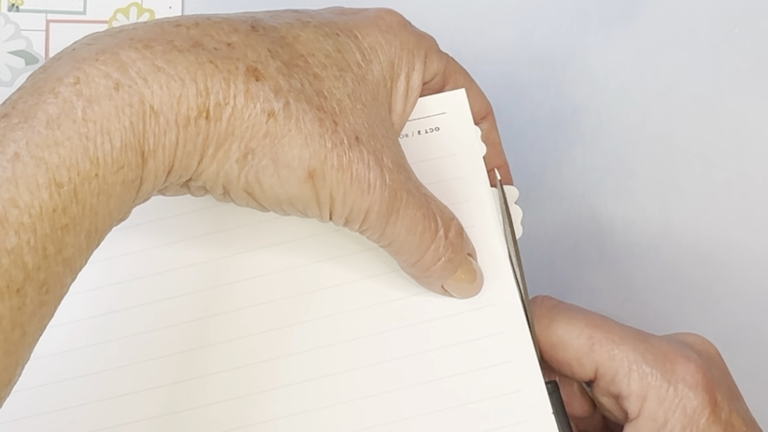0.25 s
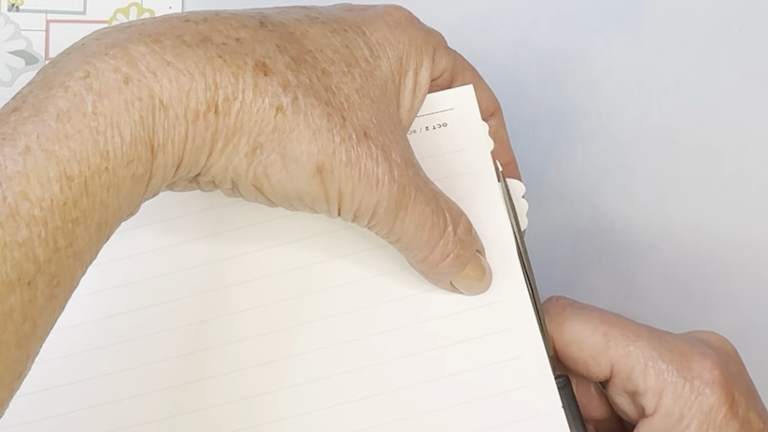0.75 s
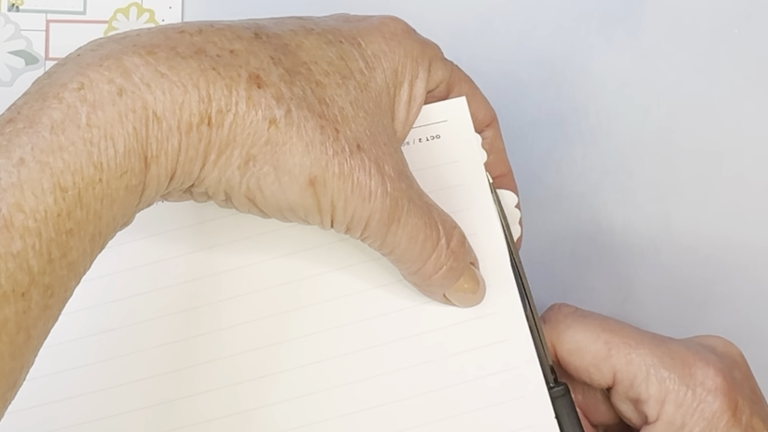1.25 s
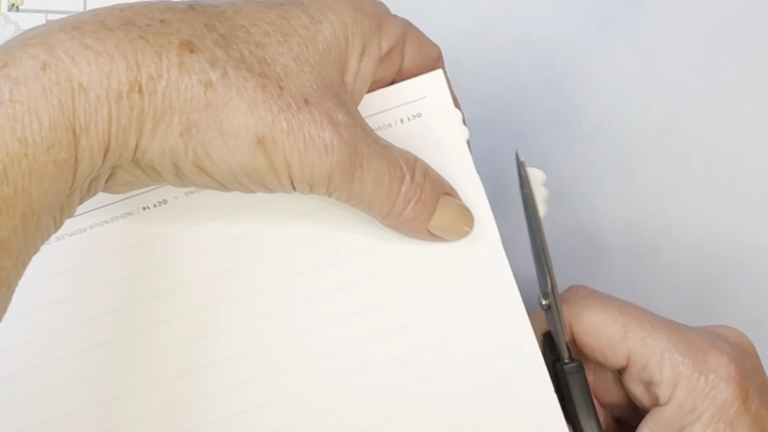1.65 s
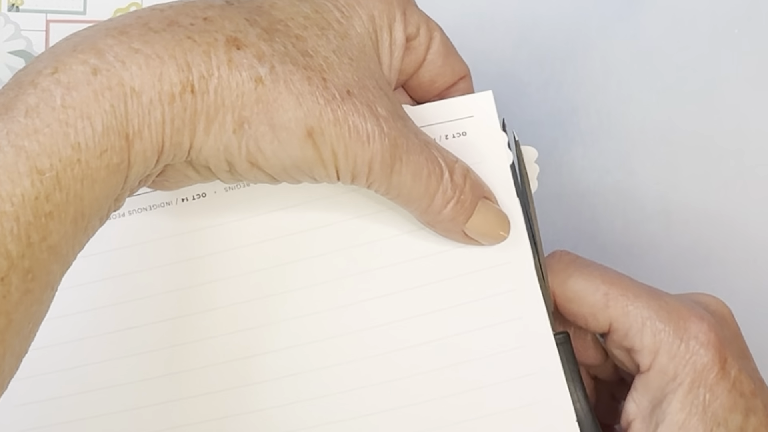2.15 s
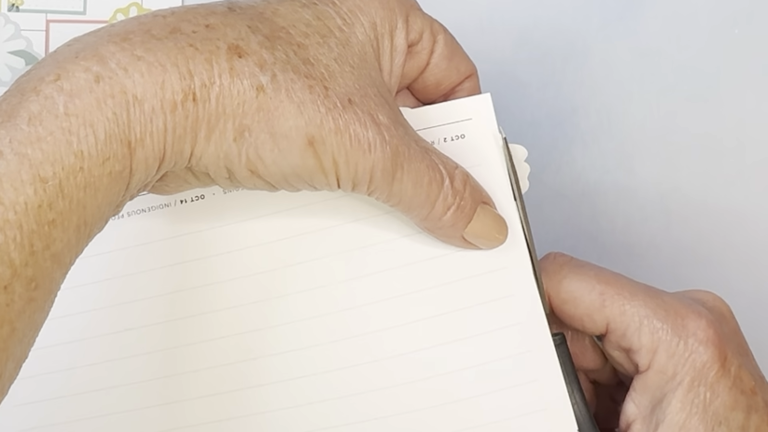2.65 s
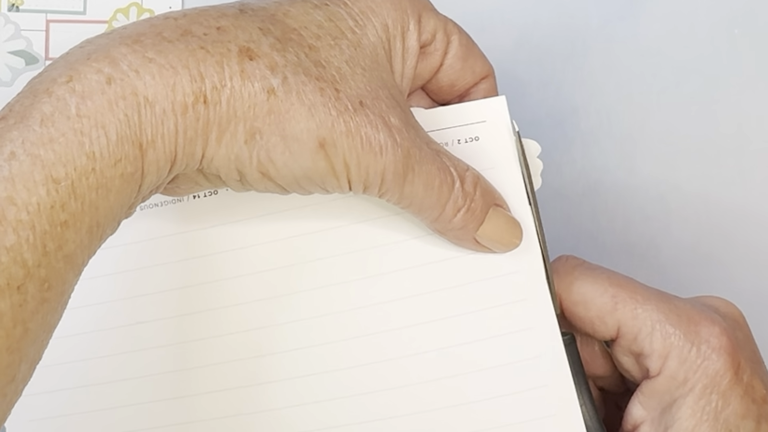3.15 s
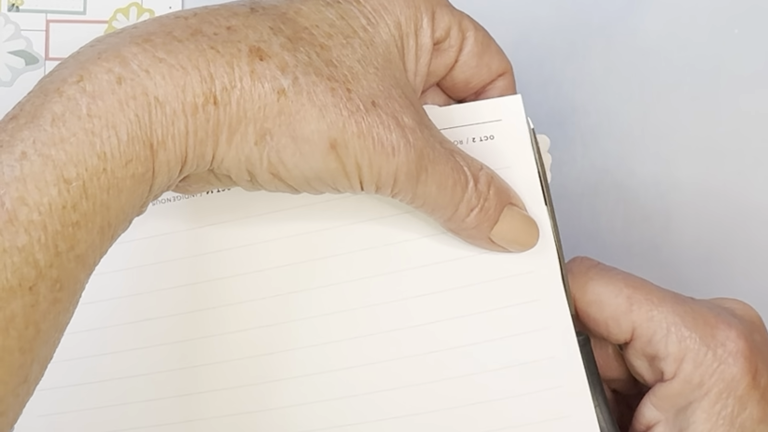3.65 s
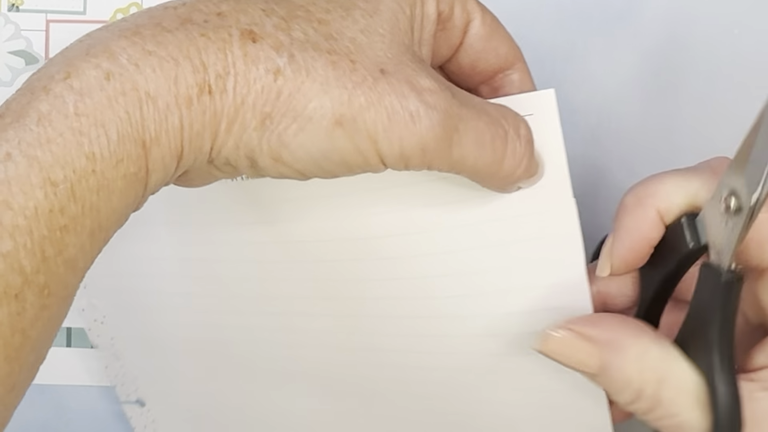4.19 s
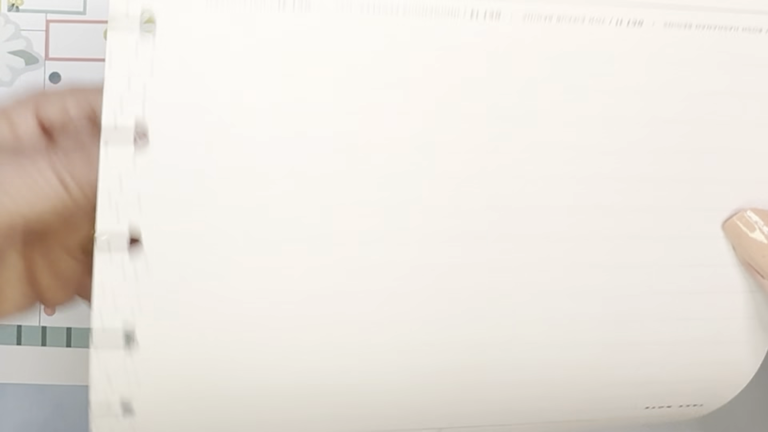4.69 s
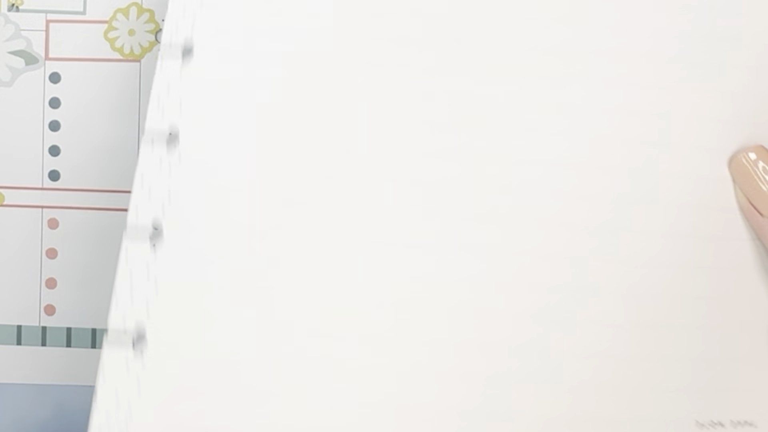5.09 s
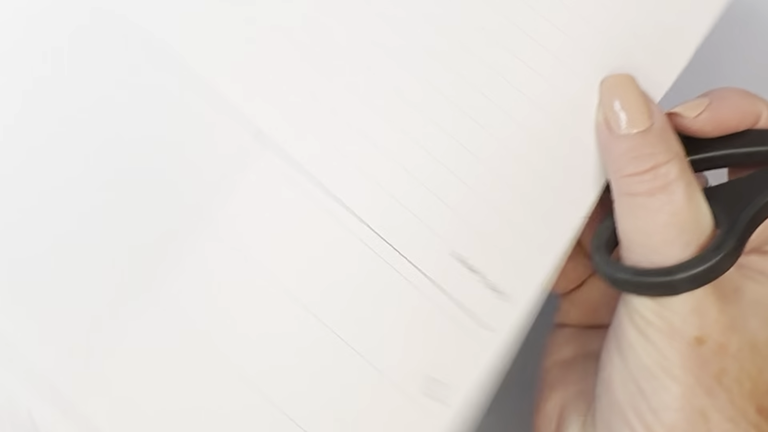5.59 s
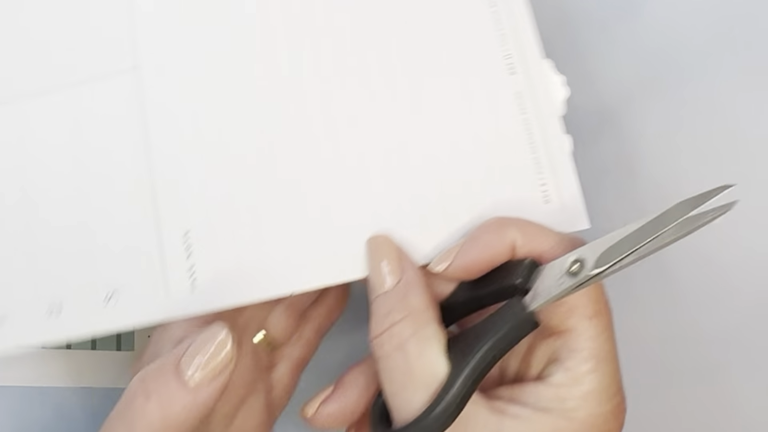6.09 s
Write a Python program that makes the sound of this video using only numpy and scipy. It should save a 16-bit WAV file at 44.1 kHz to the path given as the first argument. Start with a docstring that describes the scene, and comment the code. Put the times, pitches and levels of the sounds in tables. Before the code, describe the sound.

Close, dry paper handling: sticky rubs and small crackles, a sparse pause, then a sharp snap and crowded flaps, rustles and desk bumps.

```python
"""Hands rub, peel, bend and turn a sheet of paper over a desk, close to a two-port microphone.
Separate strokes and snaps come first, a sparser stretch after 2 s; the page lifts from 3.5 to 4.22 s,
then snaps and thuds crowd together, with two thin squeaks near 5.35 s. Stick-slip noise and cracks excite
resonances of the hollow under the page, the stiff sheet, its sliding edge and the desk; filtered air
noise and two wavering hum tones lie behind throughout, and the recorder widens the treble by phase."""
import sys
import numpy as np
from scipy import signal
from scipy.fft import rfft, irfft
from scipy.io import wavfile
from scipy.ndimage import uniform_filter1d

SR = 44100
rng = np.random.default_rng(int(sys.argv[2]) if len(sys.argv) > 2 else 0)


def pcm_store(signal):
    """Save signal as 16-bit PCM."""
    levels = np.round(np.clip(np.atleast_2d(signal), -1, 1) * 32767)
    wavfile.write(sys.argv[1], SR, levels.astype(np.int16).T)


N = 279153
T = np.arange(N) / SR  # s
HZ = np.fft.rfftfreq(N, 1 / SR)

# lower and upper resonances of the stiff sheet: (f/Hz, width/Hz, level/dB)
SHEET_LOW = [(1533, 520, 5), (2154, 650, 1.3)]
SHEET_HIGH = [(2760, 1120, 2.2), (4040, 1180, 2.6)]


def gain_of(db):
    """Decibel law: 20 dB is a factor of ten in amplitude."""
    return 10 ** (np.asarray(db) / 20)


def evened(x):
    """Normalization to unit root mean square."""
    return x / np.sqrt(np.mean(x ** 2) + 1e-20)


def read(points, hz):
    """Interpolation of a spectrum curve along logarithmic frequency."""
    f, value = np.transpose(points)
    return np.interp(np.log(hz + 1), np.log(f + 1), value)


def add(mix, s, sound):
    """Superposition: adds a sound to the mix, in place, from time s."""
    part = mix[round(s * SR):][:len(sound)]
    part += sound[:len(part)]


def ports(a, b):
    """Partial coherence: two ports hear a partly shared sound, the right one nearer to the hands."""
    # likeness of the two ports: (f/Hz, likeness 0-1)
    likeness = [(25, 0.72), (300, 0.42), (800, 1), (1300, 1), (2300, 0.94), (3500, 0.028), (6500, 0.049),
                (8500, 0.92)]
    # phase by which the left port lags: (f/Hz, lag/rad)
    phase_lag = [(60, 0.81), (800, 1.03), (1500, 1.34), (2500, 1.83), (4000, -0.16), (7000, -0.7),
                 (8000, 0.15)]
    # level of the left port over the right: (f/Hz, level/dB)
    level_tilt = [(60, -6.5), (200, -9), (700, -9.5), (2000, -6.5), (2800, -10), (3500, -9), (4100, -12),
                  (5100, -10), (6250, -13.5), (7600, -8.5), (8600, -0.5)]
    same = np.clip(read(likeness, HZ), 0, 1)
    right = rfft(a)
    left = same * right + np.sqrt(1 - same ** 2) * rfft(b)
    left = left * np.exp(-1j * read(phase_lag, HZ))
    tilt = gain_of(read(level_tilt, HZ) / 2)
    return np.array([left * tilt, right / tilt])


def body(modes, drive, cracks=0):
    """Modal resonance: driven noise and single cracks ring steep modes; unit drive gives unit level."""
    ring = 0
    for k, (hz, width, db) in enumerate(modes):
        sign = (-1) ** k  # neighbouring modes alternate in sign
        ring = ring + sign * gain_of(db) / (1 + 2j * (HZ - hz) / width) ** 2
    noise = rng.standard_normal((2, N))
    unit = np.sqrt(np.mean(irfft((ports(*noise) * ring).mean(0), N) ** 2))
    return irfft(ports(*(noise * drive + cracks)) * ring, N) / unit


def paper():
    """Common excitation: one grip drives hollow, sheet and edge; the desk thuds under the wrists."""
    # as the sheet bends: (t/s, sheet's low modes over its high modes/dB, shift to the left/dB,
    # bass of the hollow/dB, lift of the hollow's last mode but one/dB, lift of the sheet's top mode/dB,
    # fizz/dB)
    bending = [(0.0, 0, 6, 15, -8, 1.5, 0), (0.25, 3.5, -2, 2, 4.5, 3, 1), (0.7, -6, 1, 8.5, 2, -2.5, -5),
               (1.3, 3, -1, -0.5, 1, 4, 1), (1.42, -1.5, 2, 5, 0.5, -2, -9),
               (1.75, 1, 0.5, -23, 10, 6, -12), (2.05, -10.5, 2.5, -23, -1, -15, 2.5),
               (2.77, 5.5, 0.5, -2, 4, 1.5, -7), (3.66, -5.5, 1, 4, -2, 0, -1),
               (3.83, 3, 1, -23, 7.5, -2.5, -14), (4.0, -14.5, 1, 12, 8, -6, -1),
               (4.11, 3.5, 1, 13.5, 9, -0.5, -12.5), (4.59, -3.5, 2, -38, -8.5, 1, 13.5),
               (4.7, 0, 1, 9, 0, -5.5, -4.5), (5.13, -1.5, -1, 16.5, 1.5, -0.5, -3.5),
               (5.22, 4, -1.5, 10, -3.5, 2, 6), (5.58, -8, 0, -10, -9, -9, -8),
               (5.68, -7.5, 3, 7.5, 4.5, -5.5, 5), (6.17, -7, 5.5, -4, 0.5, -7.5, -4.5)]
    s, *columns = np.transpose(bending)
    low_db, left_db, deep_db, bright_db, top_db, fizz_db = (np.interp(T, s, c) for c in columns)
    rub_db, stiff_db, slide_db, sticky = hands()
    uneven_db = 4.5  # unevenness of the slips in a fully sticky stroke
    grip_db = uneven_db * sticky * slips(per_s=95, t60=0.073, spread_db=3.0)
    crackle_db = 0.48 * slips(per_s=170, t60=0.0012, spread_db=11)
    tick = sticky * ticks()

    hollow_drive = excitation(rub_db, grip_db + crackle_db, tick, crack_db=24,
                              column=0, longer=0.58, early_ms=2.555)
    cavity = hollow(hollow_drive, deep_db, bright_db)
    sheet_drive = excitation(stiff_db, 0.74 * grip_db + crackle_db, tick, crack_db=15,
                             column=2, longer=0.49, early_ms=0.64)
    plate = sheet(sheet_drive, low_db)
    edge_drive = excitation(slide_db, 0.04 * grip_db + 2.92 * crackle_db, tick, crack_db=15,
                            column=3, longer=0.79, early_ms=0.22)
    near = shifting(cavity + plate + edge(edge_drive), held_db=2.0, turned_db=3.0, top_db=top_db)
    balance = gain_of(np.array([left_db, -left_db]) / 2)
    return (near + desk(rub_db)) * balance + fizz(edge_drive, fizz_db)


def excitation(level_db, texture_db, tick, crack_db, column, longer, early_ms):
    """Broadband excitation: a noise envelope for strokes and rustle, and impulses for cracks and ticks."""
    rustle, cracks = snap_drive(column, longer, early_ms, crack_db)
    envelope = gain_of(level_db + texture_db) + rustle
    impulses = cracks + tick * gain_of(level_db + crack_db)
    return np.array([envelope, impulses])


def hollow(drive, deep_db, bright_db):
    """Cavity resonance: the hollow's bass and one upper mode rise and fall in level over time."""
    # resonances of the hollow: (f/Hz, width/Hz, level/dB)
    modes = [(463.5, 148, 3), (577.4, 88, -1), (801.4, 224, 8.5), (992, 171, 2.5), (1134, 127, 5.5),
             (1785, 570, -12)]
    sound = body(modes, *drive)
    bass_band = HZ / (HZ - 120j) / (1 + 1j * HZ / 420) ** 2
    deep = irfft(rfft(sound) * bass_band, N)
    hz, width, _ = modes[-2]
    detuning = HZ / hz - hz / (HZ + 1)
    bright = irfft(rfft(sound) / (1 + 1j * detuning * hz / (2 * width)), N)
    return sound + gain_of(deep_db) * deep + (gain_of(bright_db) - 1) * bright


def sheet(drive, low_db):
    """Plate modes: bending moves the power of the stiff sheet between its low and high modes."""
    low_share = 1 / (1 + gain_of(-2 * low_db))  # of the power
    low = body(SHEET_LOW, *drive * np.sqrt(low_share))
    return low + body(SHEET_HIGH, *drive * np.sqrt(1 - low_share))


def edge(drive):
    """Friction-driven resonance of the sliding edge."""
    # resonances of the edge: (f/Hz, width/Hz, level/dB)
    modes = [(3700, 2700, -3), (5540, 1210, 5.5), (6260, 720, 6), (7880, 3060, 1.5)]
    return body(modes, *drive)


def fizz(drive, fizz_db):
    """Nonlinear friction: the faster the slide, the brighter, by a power law of the edge's drive."""
    # resonances of the fizz: (f/Hz, width/Hz, level/dB)
    modes = [(9540, 3900, -0.68), (14570, 2200, -1.3)]
    expanded = np.sign(drive) * abs(drive) ** 1.236
    return body(modes, *gain_of(7.5 + fizz_db) * expanded)


def hands():
    """Power addition: levels (dB) of rubbing, sheet and edge, and stickiness weighted by stroke power."""
    # strokes over the page: (start t/s, length/s, rubbing level/dB, swell to the end/dB,
    # stiff sheet over the rubbing/dB, sliding edge over the rubbing/dB, stickiness 0-1)
    strokes = [(0.068, 0.14, -62.5, 8, -2, -11.5, 1), (0.256, 0.14, -57.5, -1.5, -1.5, -10.5, 1),
               (0.473, 0.36, -56.5, 3, -2, -10.5, 1), (0.944, 0.018, -60, 0, -7, -17, 0.5),
               (1.024, 0.042, -58.5, -0.5, -8, -14.5, 0), (1.137, 0.053, -57.5, 4, -3.5, -8.5, 0.1),
               (1.228, 0.081, -61.5, 0.5, -4, -10, 0.56), (1.319, 0.12, -50, 7.5, -2, -12.5, 1),
               (1.463, 0.059, -52.5, -4, 2, -5.5, 0.5), (1.535, 0.084, -50, -1.5, -4, -12, 0.86),
               (1.617, 0.19, -57, 8, 2.5, -3.5, 0.27), (1.804, 0.14, -60.5, -6.5, 3.5, -12, 0.04),
               (1.983, .18, -51, 3, -1.5, -20, 0), (2.333, 0.017, -50.5, -6.5, -3.5, -15, 0.75),
               (2.403, 0.043, -75.5, 16, -3.5, -25, 0.4), (2.656, 0.11, -50.5, 2.5, -7.5, -28, 0.35),
               (2.953, 0.066, -46.5, -2, -3.5, -11, 1), (3.318, 0.12, -51.5, -1, -2, -11, 1),
               (3.525, 0.16, -67, 18, -1, -8, 0.96), (3.682, 0.041, -35.5, -9.5, -1, -12.5, 0.8),
               (3.734, 0.1, -41.5, -7, -2.5, -13.5, 0.56), (3.868, 0.044, -54, -5.5, 0.5, -7.5, 0.6),
               (3.931, 0.019, -47.5, 3, -2.5, -10.5, 0.74), (3.969, 0.081, -51.5, -4, 3.5, -4.5, 0.5),
               (4.081, 0.036, -53.5, 11.5, -3.5, -4.5, 0.43), (4.127, 0.13, -44.5, -8, -2, -3.5, 0.5),
               (4.285, 0.22, -55.5, 2, 4, 7, 0.79), (4.527, 0.018, -42, -4.5, -2.5, -4, 0.74),
               (4.561, 0.1, -64.5, 7, 9.5, 8, 0.8), (4.694, 0.011, -41, -11.5, 2, 1, 1),
               (4.76, 0.13, -35, -16, -1, -13, 1), (4.902, 0.094, -47, -10, -4.5, -11.5, 1),
               (5.097, 0.042, -48, -6, 3.5, 2, 0.54), (5.162, .12, -50.5, 8, -15, -15.5, 0.95),
               (5.298, 0.066, -57, 3, -1, 3.5, 0.1), (5.38, 0.074, -56, 6.5, -5.5, -12.5, 0.47),
               (5.47, 0.06, -46, 9, -3.5, -7.5, 0.27), (5.556, 0.049, -37, -3, -8, -9.5, 0.14),
               (5.627, 0.18, -50, -1, 4, 2, 0.53), (5.801, 0.17, -61, -1.5, 9, 14, 0.3),
               (5.973, 0.056, -48, 1, 0, -2, 0.7), (6.055, 0.096, -53.5, -1.5, 7, 8, 0),
               (6.157, 0.089, -47, 4, 1, -1.5, 0.7), (6.27, 0.076, -53.5, -0.5, 6.5, 5, 1)]
    rise_db_per_s, fall_db_per_s = 905, 471  # how fast a stroke sets in and lets go
    rest_db = np.array([-76.5, -77, -82.5])  # hands at rest: rubbing, sheet, edge
    power, stuck = gain_of(2 * rest_db)[:, None] * np.ones(N), np.zeros(N)
    for start, length, db, swell_db, sheet_db, edge_db, sticky in strokes:
        stroke = held(start, length, db, swell_db, rise_db_per_s, fall_db_per_s)
        power = power + gain_of(2 * np.array([0, sheet_db, edge_db]))[:, None] * stroke
        stuck = stuck + np.clip(sticky, 0, 1) * stroke
    return *10 * np.log10(power), stuck / power[0]


def held(start, length, db, swell_db, rise_db_per_s, fall_db_per_s):
    """Exponential envelope: power of a gesture that sets in, swells evenly in dB and lets go."""
    t = T - start
    edges_db = np.minimum(t, 0) * rise_db_per_s - np.maximum(t - length, 0) * fall_db_per_s
    level_db = db + swell_db * np.clip(t / length, 0, 1) + edges_db
    return gain_of(2 * np.maximum(level_db, -150))


def slips(per_s, t60, spread_db):
    """Stick-slip: quick starts of random size die away; the log level has zero mean and unit spread."""
    kicks = (rng.random(N) < per_s / SR) * gain_of(spread_db * rng.standard_normal(N))
    level = signal.lfilter([1], [1, -gain_of(-60 / t60 / SR)], kicks)  # 60 dB decay in t60 seconds
    level = np.log(uniform_filter1d(level, round(t60 * SR / 20)) + 0.22)
    return evened(level - level.mean())


def ticks():
    """Poisson impulses: sparse fibre ticks of random size and sign, for a stroke of unit level."""
    per_s, db, spread_db = 260, -8.5, 4  # level under a crack at the level of the stroke
    size = gain_of(db + spread_db * np.minimum(rng.exponential(1, N), 4))
    return size * rng.choice([-1., 1.], N) * (rng.random(N) < per_s / SR)


def snap_drive(column, longer, early_ms, crack_db):
    """Impulsive release: snaps swell and fade; the quicker the swell, the more they are one clean crack."""
    # snaps of the paper: (peak t/s, peak level/dB, sheet over the peak/dB, edge over the peak/dB, swell/ms)
    snaps = [(0.119, -52, 2, -14, 2.1), (0.16, -44.5, 3.5, -7, 1.7), (0.321, -50.5, -4, -14, 6.2),
             (0.483, -44, -2.5, -10, 1.8), (0.577, -47, -4.5, -29, 5.6), (0.601, -41.5, -1.5, -15, 1.8),
             (0.618, -41.5, -5, -17, 2.3), (0.65, -39, 1, -13, 1.7), (0.682, -43.5, -10, -20, 16),
             (0.705, -41.5, -3, -13, 4.4), (0.757, -38, -6, -15.5, 4.3), (0.784, -38, -3.5, -15, 1.85),
             (0.807, -39.5, -8, -17, 3.6), (0.826, -41, -4, -17, 1.2), (1.161, -40, 4, -1.5, 1.45),
             (1.306, -38.5, -5, -19, 0.78), (1.315, -31.5, -6, -26, 1.8), (1.41, -29.5, 3.5, -1.5, 3.8),
             (1.442, -40, -5, -11, 3.2), (1.521, -46, -16, -25, 0.54), (2.33, -47, -5, -23, 0.55),
             (2.941, -39, -3.5, -18, 2.1), (3.285, -41.5, -6.5, -11, 7.2), (3.322, -32, -1, -12, 1.2),
             (3.334, -36, 0, -15, 0.26), (3.366, -37.5, 1.5, -11, 0.67), (3.403, -39, -6, -28, 2.4),
             (3.421, -35.5, -3.5, -12, 2.4), (3.566, -49, 6, -3, 0.88), (3.593, -47, 6, -7, 0.88),
             (3.618, -44.5, 1.5, -4, 1.2), (3.669, -29, -2.5, -12, 3.3), (3.678, -18, -1, -12.5, 0.54),
             (3.735, -30.5, -12, -44, 1.2), (3.754, -44, -0.5, -39, 10), (3.821, -45, 5, -5, 2),
             (3.936, -43, -3, -34, 0.76), (3.966, -33, -3, -16, 1.3), (4.064, -45, 8, 3, 1.5),
             (4.078, -32.5, -19, -26, 7.4), (4.125, -30.5, -19, -37, 7.3), (4.138, -27, -32, -35, 2),
             (4.228, -40, -2, -4, 0.98), (4.688, -30, 6, -14, 1.14), (4.757, -40, -16, 1, 6.5),
             (4.797, -42, -4, -19, 3.2), (4.81, -30.5, 0, -7, 1.7), (4.817, -29, -24, -34, 0.82),
             (4.851, -27, 8, -8.5, 0.24), (4.866, -47, 8, 5.5, 7.6), (4.881, -26, -28, -36, 1.46),
             (4.907, -31.5, 0.5, -9, 1.2), (5.088, -46, 5.5, 9.5, 4.2), (5.159, -31.5, -5.5, -8.5, 3),
             (5.173, -34, -19, -46, 10), (5.229, -35.5, -9, -17, 1.1), (5.244, -27.5, -19, -35, 1.4),
             (5.265, -24, -20.5, -42, 1), (5.328, -40.5, -14, -17, 6.1), (5.567, -19, -14, -30, 2.46),
             (5.575, -25.5, -30, -42, 4.7), (5.594, -29, -30, -35, 2.2), (5.763, -39, -2, -2.5, 4.2),
             (5.966, -36, -7, -23, 2.2), (6.157, -23.5, -8, -14, 2), (6.223, -31, -9, -14.5, 5.9)]
    fixed_fade_ms, fade_per_swell = 3.2, .6  # a fixed time plus a share of the swell
    crack_ms = 1.6  # snaps that swell quicker than this are mostly crack
    rustle, cracks = np.zeros(N), np.zeros(N)
    ms = np.arange(-SR // 20, SR // 8) * 1000 / SR
    for row in snaps:
        swell_ms = np.clip(row[4], .3, 30)
        fade_ms = fixed_fade_ms + fade_per_swell * swell_ms
        clean = np.exp(-(swell_ms / crack_ms) ** 2)
        peak = gain_of(row[1] + (row[column] if column else 0))
        start = row[0] - early_ms / 1000  # slow bodies are pushed earlier
        # 8 dB down at one swell time before the peak and one lengthened fade time after it
        drop = np.where(ms < 0, (ms / swell_ms) ** 2, ms / (longer * fade_ms))
        add(rustle, start + ms[0] / 1000, peak * (1 - .85 * clean) * gain_of(-8 * drop))
        add(cracks, start, [peak * clean * gain_of(crack_db)])
    return rustle, cracks


def shifting(x, held_db, turned_db, top_db):
    """Time-varying modes: narrow while held, drifting patches, a bent top mode and a moving resonance."""
    # narrow modes of the page while it lies held on the desk: (f/Hz, width/Hz, lift/dB)
    held_modes = [(1537, 57, -0.5), (2246, 30, 2), (3380, 38, 0.5), (3872, 23, 5.5), (4177, 23, 3),
                  (6240, 106, 1.5)]
    # resonance that moves as the sheet is bent and turned: (t/s, f/Hz, lift/dB)
    sweep = [(0.4, 2750, 6.5), (2.0, 2680, 11), (3.85, 2590, 10.5), (4.25, 2950, 7), (4.6, 1940, 6.5),
             (5.05, 2630, 11.5), (5.5, 2520, 4), (5.92, 2820, 6), (6.1, 3920, 6)]
    sweep_width_hz, sweep_ports = 276, np.array([1, 0.19])  # share of the lift in left and right
    lift_s = [3.5, 4.22]  # the page leaves the desk between these times
    ring = sum((gain_of(db) - 1) / (1 + 2j * (HZ - hz) / width) for hz, width, db in held_modes)
    rung = irfft(rfft(x) * ring, N)
    page = x + rung * np.interp(T, lift_s, [1, 0])
    hz, t, z = signal.stft(page, SR, nperseg=512, noverlap=384)

    patches = rng.standard_normal(z.shape[1:]) + 0.55 * rng.standard_normal(z.shape)  # mostly shared
    for _ in range(2):
        patches = uniform_filter1d(patches, size=16)  # along time
    patches = evened(uniform_filter1d(patches, size=3, axis=1))  # along frequency
    hz = hz[:, None]
    less_below = np.clip(hz / SHEET_LOW[0][0], .5, 1)  # the hollow varies less
    depth_db = np.interp(t, lift_s, [held_db, turned_db]) * less_below

    top_hz, width, _ = SHEET_HIGH[-1]
    lift_db = np.interp(t, T, top_db) * np.exp(-((hz - top_hz) / width) ** 2)
    s, sweep_hz, sweep_db = np.transpose(sweep)
    bell = np.exp(-((hz - np.interp(t, s, sweep_hz)) / sweep_width_hz) ** 2)
    lift_db = lift_db + sweep_ports[:, None, None] * np.interp(t, s, sweep_db) * bell
    z = z * gain_of(depth_db * patches + lift_db)
    return signal.istft(z, SR, nperseg=512, noverlap=384)[1][:, :N]


def desk(rub_db):
    """Structure-borne sound: thuds and a share of the rubbing shake the desk's low and high modes."""
    # resonances of the desk: (f/Hz, width/Hz, level/dB)
    modes = [(57.6, 43, 1), (113, 61, 1.5), (180, 210, -3.5), (316, 190, -11)]
    # thuds of the wrists: (onset t/s, level/dB, held/s, low modes over high modes/dB)
    thuds = [(1.42, -44.5, 0.03, 5), (1.541, -43.5, 0.02, 0), (1.798, -52, 0.0044, 15),
             (2.144, -45.5, 0.0051, 7), (3.679, -37, 0.0033, -7), (4.14, -38, 0.028, -1),
             (4.534, -48.5, 0.011, -2), (4.769, -43, 0.053, 1), (4.859, -38.5, 0.057, 2.5),
             (4.961, -41, 0.029, 7.5), (5.089, -48, 0.021, -1), (5.171, -36.5, 0.015, 9),
             (5.24, -35.5, 0.044, 8), (5.574, -37, 0.018, -3.5), (5.766, -41.5, 0.013, 8),
             (5.999, -44, 0.0043, 10), (6.224, -36, 0.015, 7)]
    rise_db_per_s, fall_db_per_s = 596, 354
    rub_share_db = -15  # share of the rubbing that reaches the desk
    push_db = 23.5  # the single push of a thud over its rumble
    low = high = gain_of(2 * (rub_db + rub_share_db)) / 2  # powers
    push = np.zeros((2, N))
    for s, db, length, low_db in thuds:
        thud = held(s, length, db, 0, rise_db_per_s, fall_db_per_s)
        share = 1 / (1 + gain_of(-2 * low_db))
        low, high = low + share * thud, high + (1 - share) * thud
        push[:, round(s * SR)] = gain_of(db + push_db) * np.sqrt([share, 1 - share])
    return body(modes[:2], np.sqrt(low), push[0]) + body(modes[2:], np.sqrt(high), push[1])


def squeak():
    """Frequency glide: short, nearly clean falling tones in the slide, stronger in the right port."""
    # thin tones: (start t/s, length/s, start f/Hz, glide/(Hz/s), level/dB)
    squeaks = [(5.328, 0.066, 955, -100, -47.5), (5.363, 0.04, 3110, -1500, -51.5)]
    tones = np.zeros(N)
    for start, length, hz, glide, db in squeaks:
        t = np.arange(0, length, 1 / SR)
        swell = np.sin(np.pi * t / length)
        add(tones, start, gain_of(db) * swell * np.sin(2 * np.pi * (hz + glide * t / 2) * t))
    return irfft(ports(tones, tones), N)


def room():
    """Stationary background: the sum of steady air noise and a faint hum."""
    return air_noise() + hum()


def air_noise():
    """Spectral shaping: white noise filtered to the steady spectrum of room air."""
    # relative spectrum of the air noise: (f/Hz, level per Hz/dB)
    spectrum = [(20, -40), (45, -8), (70, -7), (125, -11), (250, -21), (450, -27), (1100, -27), (2500, -35),
                (5600, -36), (8500, -44), (16000, -53)]
    level_db = -62.5  # of the mean of the two ports
    air = irfft(ports(*rng.standard_normal((2, N))) * gain_of(read(spectrum, HZ)), N)
    return air * gain_of(level_db) / np.sqrt(np.mean(air.mean(0) ** 2))


def hum():
    """Amplitude modulation: steady tones waver slowly in level, stronger in the right port."""
    # hum before its split between the ports: (f/Hz, level/dB)
    tones = [(117.3, -68.5), (61, -67)]
    waver = evened(uniform_filter1d(rng.standard_normal((len(tones), N)), 3000))
    mono = sum(gain_of(db + 4.0 * w) * np.sin(2 * np.pi * hz * T) for (hz, db), w in zip(tones, waver))
    return mono * gain_of([[-3], [3]])


def scene():
    """Linear superposition of paper, squeaks and room."""
    return paper() + squeak() + room()


def record(dry):
    """Linear filtering: the microphone thins the deep bass, the recorder turns treble phase and limits the band."""
    # phase by which the right treble leads the left: (f/Hz, lead/half turns)
    widening = [(7900, 0), (9000, .95), (9500, 1), (10500, .03), (11600, 0), (13000, -.97), (13800, -1),
                (15000, -2)]
    bass_cut_hz, band_limit_hz = 24, 16000
    turn = np.exp(.5j * np.pi * np.interp(HZ, *np.transpose(widening)))
    bass_cut = (HZ / (HZ - 1j * bass_cut_hz)) ** 2
    wide = irfft(rfft(dry) * np.array([1 / turn, turn]) * bass_cut, N)
    band_limit = signal.firwin(511, band_limit_hz, window=("kaiser", 9), fs=SR)
    return signal.oaconvolve(wide, band_limit[None], "same")


dry = scene()
out = record(dry)
pcm_store(out)
```